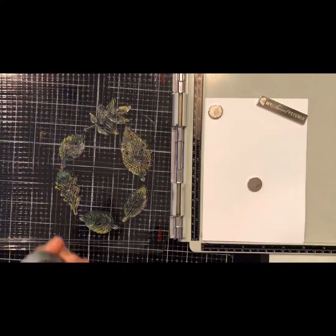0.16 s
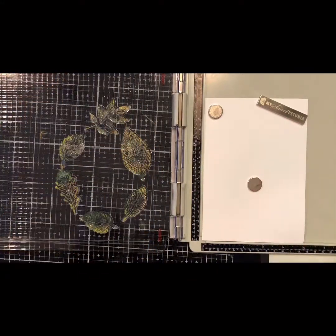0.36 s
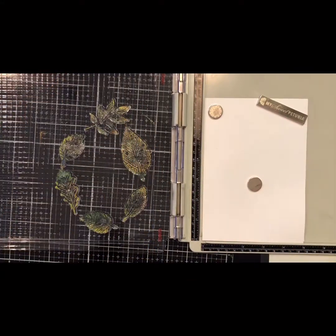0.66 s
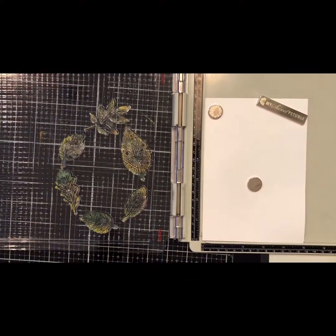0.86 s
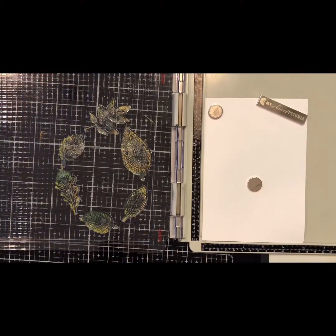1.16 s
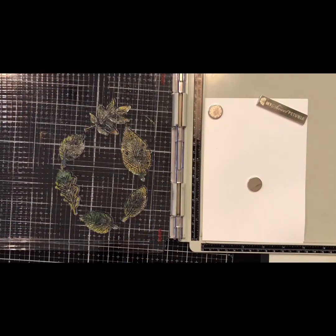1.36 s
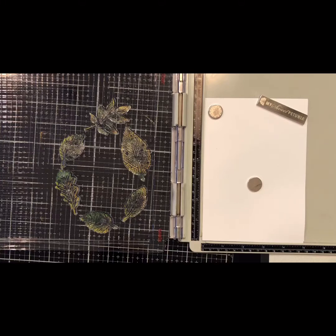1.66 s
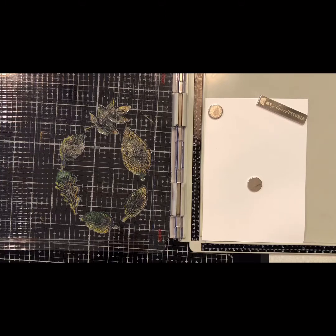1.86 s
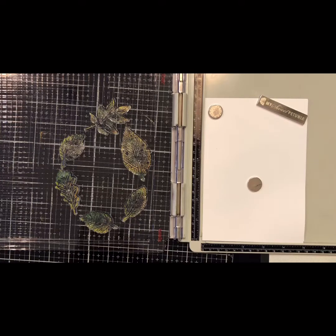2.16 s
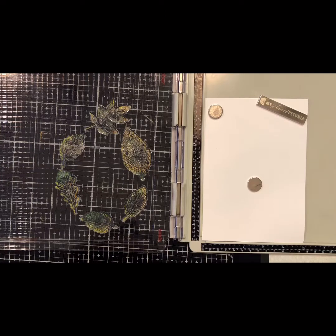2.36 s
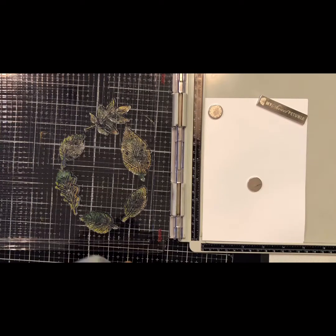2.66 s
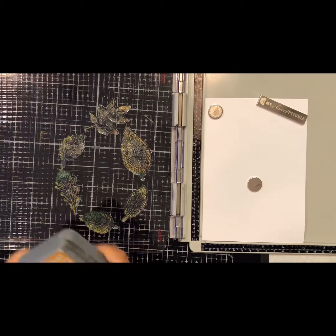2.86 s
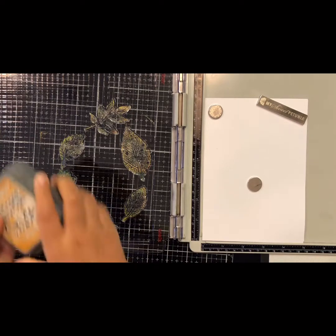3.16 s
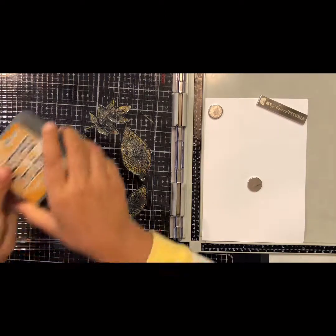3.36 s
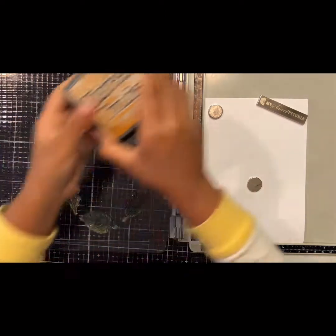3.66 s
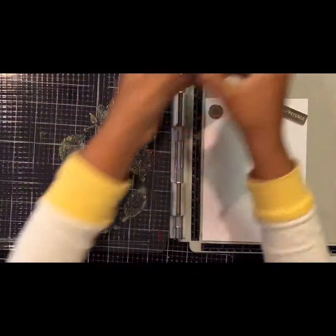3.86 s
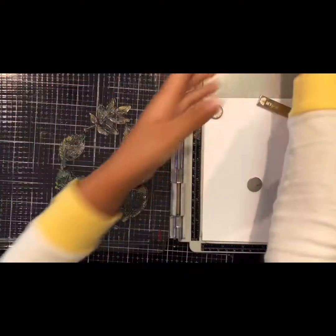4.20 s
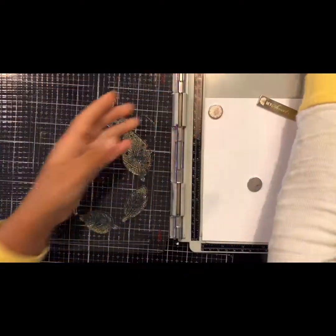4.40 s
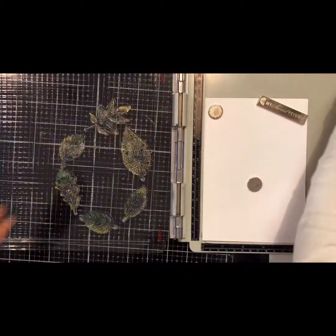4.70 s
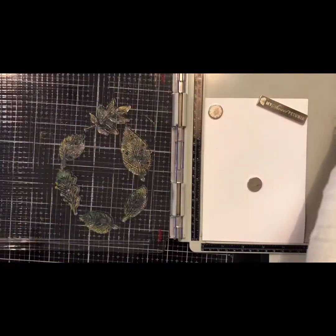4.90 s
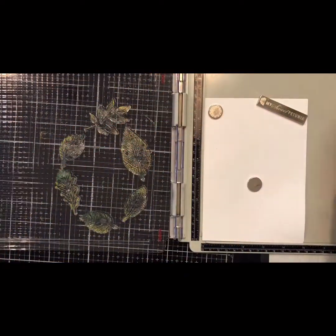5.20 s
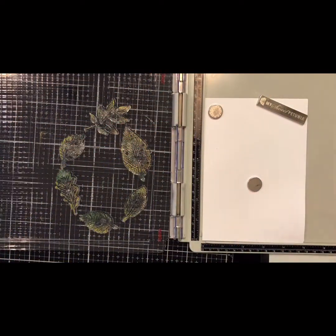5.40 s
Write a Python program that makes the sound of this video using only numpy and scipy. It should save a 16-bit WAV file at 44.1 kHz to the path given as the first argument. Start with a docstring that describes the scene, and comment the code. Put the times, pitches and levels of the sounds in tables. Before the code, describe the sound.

A plastic ink pad clicks and ticks softly in the hands, then pad and lid clatter onto a table, over quiet room hum.

```python
"""A craft table in a small room, heard close up from one microphone above the table top.
Ventilation and mains hum lie underneath; skin slides on plastic and sleeves brush the table edge.
The case of a plastic ink pad clicks in the hands, and the tacky pad ticks as it is dabbed on clear stamps.
Then pad and lid are put down: each blow rings the plastic shell and thuds in the table, the pad bounces,
the lid rocks to rest, and the walls answer briefly."""
import sys
import numpy as np
from scipy import signal
from scipy.fft import rfft, irfft, next_fast_len
from scipy.io import wavfile
from scipy.ndimage import map_coordinates

SR = 44100
rng = np.random.default_rng(int(sys.argv[2]) if len(sys.argv) > 2 else 0)


def int16_out(signal):
    """Quantize to a 16-bit WAV file."""
    q = np.round(np.clip(np.atleast_2d(signal).T, -1, 1) * 32767)
    wavfile.write(sys.argv[1], SR, q.astype(np.int16))


N = 244311
HIT_SAMPLES = 4096


def amp(db):
    """Decibels to gain."""
    return 10 ** (np.asarray(db) / 20)


def unit(x):
    """Scale to rms 1."""
    return x / np.sqrt(np.mean(x ** 2) + 1e-20)


def sized(x, db):
    """Scale a short sound to the energy of 5 ms at this level."""
    return x * amp(db) * np.sqrt(0.005 * SR / np.sum(x ** 2))


def add(track, time, x):
    """Mix x into the track at a time in seconds."""
    part = track[round(time * SR):][:len(x)]
    part += x[:len(part)]


def along(points, hz):
    """Interpolate (frequency, value) points on a log frequency axis."""
    freqs, values = np.transpose(points)
    return np.interp(np.log(hz + 1), np.log(freqs + 1), values)


def wobble(rate):
    """A smooth random curve, rate knots a second."""
    knots = rng.standard_normal(int(N * rate / SR) + 4)
    return map_coordinates(knots, [np.arange(N) * rate / SR])


def filtered(x, response):
    """Pass x through a complex frequency response."""
    size = next_fast_len(2 * len(x))
    return irfft(rfft(x, size) * response(np.fft.rfftfreq(size, 1 / SR)), size)[:len(x)]


def band(x, edges_hz, kind, order):
    """Causal Butterworth filter."""
    return signal.sosfilt(signal.butter(order, edges_hz, kind, fs=SR, output='sos'), x)


def noise(spectrum):
    """Coloured noise of rms 1."""
    return unit(filtered(rng.standard_normal(N), lambda hz: amp(along(spectrum, hz))))


def resonance(f, hz, width):
    """One damped mode, gain 1 at its centre."""
    return 1j * f * width / (hz * hz - f * f + 1j * f * width)


def ring(x, modes):
    """x drives an object's modes; heard near the struck spot they cancel in the gaps between them."""
    return filtered(x, lambda f: sum(amp(db) * resonance(f, hz, width) for hz, width, db in modes))


# ventilation noise in the room: (frequency [Hz], relative density [dB])
AIR_SPECTRUM = [(25, -35), (45, -24.5), (60, -16.5), (100, -16.5), (160, -6), (250, -8), (400, -9),
                (600, -14), (900, -17), (1400, -25), (2300, -33.5), (5000, -41), (9000, -48),
                (16000, -49.5)]
# hum lines of mains and fan: (frequency [Hz], relative level [dB])
HUM_LINES = [(59.5, -68.5), (149, -57.5), (186, -62), (237.5, -59), (296.8, -59), (356.2, -59.5),
             (415, -61), (546, -66.5)]


def room_tone():
    """Behind everything, soft ventilation noise and slightly unsteady hum."""
    t = np.arange(N) / SR
    hum = np.zeros(N)
    for hz, db in HUM_LINES:
        hum += amp(db + 1.9 * wobble(3)) * np.sin(2 * np.pi * hz * t + 0.35 * wobble(3.7))
    air = amp(-54 + 1.2 * wobble(2.4)) * noise(AIR_SPECTRUM)
    return amp(-0.5) * hum + air


# reverberation of the small room: (frequency [Hz], time to fall 60 dB [s])
ROOM_DECAY = [(200, 0.63), (1000, 0.44), (2500, 0.47), (6000, .38), (14000, 0.21)]


def room(x, early_db, tail_db, early_t60):
    """Reflections at the microphone: quick scatter off the near table top, a tail from the walls."""
    hz, frame_times, spectra = signal.stft(rng.standard_normal(SR // 2), SR, nperseg=256)
    decay = amp(-60 * frame_times / along(ROOM_DECAY, hz)[:, None])
    tail = signal.istft(spectra * decay, SR, nperseg=256)[1]
    t = np.arange(len(tail)) / SR
    early = rng.standard_normal(len(t)) * amp(-60 * t / early_t60)
    onset = 1 - np.exp(-(t / 0.0007) ** 2)
    echoes = amp(early_db) * early / np.linalg.norm(early) + amp(tail_db) * tail / np.linalg.norm(tail)
    return signal.fftconvolve(x, onset * echoes)[:N]


def strokes(rows, rise, steepness):
    """Gain of sliding: each stroke speeds up for a share (rise) of its length, then slows to rest."""
    t, gain = np.arange(N) / SR, np.zeros(N)
    for start, length, db in rows:
        effort = np.interp(t, [start, start + rise * length, start + length], [0, 1, 0])
        gain += amp(db) * np.sin(np.pi / 2 * effort) ** steepness
    return gain


# hiss of skin on plastic: (frequency [Hz], relative density [dB])
SKIN_SPECTRUM = [(1180, -24), (2000, -3.5), (2760, -9), (4230, -8), (7380, -13.5), (14800, -14),
                 (16000, -12)]
# slides of the hands: (time [s], length [s], top level [dB])
SKIN_SLIDES = [(-0.08, 0.21, -65), (0.73, 0.41, -73), (1.75, 0.086, -63.5), (1.92, 0.45, -72),
               (2.6, 0.33, -64.5), (2.94, 0.24, -65), (4.83, 0.27, -71), (5.28, 0.18, -64),
               (5.47, 0.1, -68)]


def skin():
    """Skin slides over the plastic with a faint, grainy hiss."""
    motion = strokes(SKIN_SLIDES, rise=0.34, steepness=0.91)
    return motion * unit(noise(SKIN_SPECTRUM) * amp(2.1 * wobble(250)))


def stick_slip(slips_per_s, rate_swing, depth):
    """Cloth catches and lets go: a gain that jumps at each release and dies down before the next."""
    cycles = np.cumsum(slips_per_s * np.exp(rate_swing * wobble(40))) / SR
    return 1 - depth + depth * unit(amp(-26 * (cycles % 1)))


# rub of cloth on the table: (frequency [Hz], relative density [dB])
CLOTH_SPECTRUM = [(350, -19), (520, 5.5), (750, -4.5), (1000, 2), (1350, -6.5), (1650, -9.5), (3000, -22),
                  (5000, -30), (12000, -36), (16000, -57)]
# passes of the sleeves: (time [s], length [s], top level [dB])
SLEEVE_BRUSHES = [(0.15, 0.14, -58.5), (2.02, 0.12, -58.5), (2.27, 0.16, -55.5), (2.885, 0.17, -48.5),
                  (3.45, 0.397, -60), (5.44, 0.11, -49.5)]


def sleeves():
    """Sleeves brush the table edge in small uneven catches."""
    motion = strokes(SLEEVE_BRUSHES, rise=0.8, steepness=0.74)
    rub = noise(CLOTH_SPECTRUM) * stick_slip(slips_per_s=190, rate_swing=0.12, depth=0.68)
    return motion * unit(rub * amp(1.9 * wobble(60)))


def contact(length, grit, rise):
    """A sharp push and a scatter of tiny slips that swells over a share (rise) of its length, then dies."""
    progress = np.arange(HIT_SAMPLES) / SR / length
    swell = 1 - np.exp(-(progress / rise) ** 2)
    slips = rng.standard_normal(HIT_SAMPLES) * amp(-20 * progress) * swell
    return (progress == 0) + grit * slips / np.linalg.norm(slips)


# modes of the pad's base, dabbed here and put down later: (frequency [Hz], width [Hz], gain [dB])
PAD_MODES = [(596, 110, -5), (937, 81, -5.5), (1357, 190, -5), (1783, 480, -4), (2800, 1000, -7.5),
             (3900, 800, -12.5), (4780, 1000, -12.5), (6730, 930, -11), (8980, 1600, -13),
             (10700, 1300, -17), (13900, 1500, -22)]
# light touches on the pad: (time [s], tap level [dB], crackle level [dB])
PAD_TOUCHES = [(0.98, -52.5, -57.5), (1.653, -60, -58.5), (1.696, -48, -64), (1.726, -56, -72),
               (1.793, -57.5, -74), (1.885, -59.5, -78), (1.926, -62, -83), (2.106, -50.5, -52.5),
               (2.446, -57.5, -61), (2.484, -58.5, -64), (2.634, -54, -58.5), (3.023, -50.5, -61),
               (3.518, -53, -61)]


def ticks():
    """Fingers and tacky ink tick on the pad: a dull tap and a fine sticky crackle."""
    out = np.zeros(N)
    for time, tap_db, crackle_db in PAD_TOUCHES:
        touch = contact(length=0.0036, grit=3.1, rise=0.086)
        tap = band(ring(touch, PAD_MODES), 2700, 'low', order=1)
        crackle = band(touch, 4800, 'high', order=2)
        add(out, time, sized(tap, tap_db) + sized(crackle, crackle_db))
    return out + room(out, early_db=-13.5, tail_db=-8.5, early_t60=0.036)


# modes of the table top below the microphone: (frequency [Hz], width [Hz], gain [dB])
TABLE_MODES = [(250, 100, -13.5), (360, 150, -2), (460, 150, 0), (600, 110, -8)]


def knock(hit, push, modes, focus_db, focus_width_hz, fizz_db):
    """The shell rings, most near the struck spot's note; hard blows crack and fizz, flat ones thud."""
    _, level_db, bright_db, note_hz, _ = hit
    flat_note_hz, crack_from_hz, fizz_from_hz = 920, 2450, 7000
    # contacts smaller than a full, flat blow sound higher and thud less: 31 dB an octave
    thud_db = -2.5 - 31 * np.log2(note_hz / flat_note_hz)
    thud = sized(band(ring(push, TABLE_MODES), [190, 800], 'band', order=3), thud_db)
    shell = ring(push, modes)
    spot = filtered(shell, lambda f: 1 + amp(focus_db) * resonance(f, note_hz, focus_width_hz))
    radiated = band(spot, max(340, 0.37 * note_hz), 'high', order=4)  # a small shell gives little bass
    body = sized(band(radiated, crack_from_hz, 'low', order=4), 0)
    crack = sized(band(shell, [crack_from_hz, fizz_from_hz], 'band', order=4), bright_db)
    fizz = sized(band(shell, fizz_from_hz, 'high', order=5), fizz_db + 1.35 * bright_db)
    return amp(level_db) * (thud + body + crack + fizz)


def knocks(hits, modes, grit, rise, **tone):
    """An object's blows: jagged straight to the microphone, smoother as spread in all directions."""
    direct, spread = np.zeros((2, N))
    for hit in hits:
        time, length = hit[0], hit[-1]
        add(direct, time, knock(hit, contact(length, grit, rise), modes, **tone))
        add(spread, time, knock(hit, signal.unit_impulse(HIT_SAMPLES), modes, **tone))
    return direct, spread


# modes of the case, damped by the hands: (frequency [Hz], width [Hz], gain [dB])
CASE_MODES = [(772, 210, -17.5), (990, 89, -5.5), (1200, 110, -8.5), (1390, 270, 2), (2030, 430, -3),
              (2780, 300, -4), (3236, 570, 3), (3680, 440, -4.5), (4230, 380, 3), (5280, 450, -4),
              (7630, 1940, -18.5), (12860, 9200, -27.5)]
# its modes that ring on after a snap: (frequency [Hz], width [Hz], gain [dB])
CASE_AFTER_RING = [(1230, 11, 0.5), (2680, 11, 6.5), (3690, 14, 1)]
# clicks in the hands: (time [s], body level [dB], brightness [dB], note [Hz], contact length [s])
CASE_CLICKS = [(0.6325, -25.5, -1, 1930, 0.0025), (0.778, -41, -5, 1260, 0.011),
               (0.7895, -22.5, -1, 1230, 0.0052), (0.7985, -35, -15, 1210, 0.0021),
               (0.808, -32.5, -22, 1300, 0.014), (0.9375, -40.5, -9.5, 1350, 0.007),
               (1.087, -44.5, -10.5, 1320, 0.0071), (1.1402, -26.5, -6, 1150, 0.0044),
               (3.2415, -48, -10, 1620, 0.0089)]


def case():
    """The lid scrapes and snaps over the rim of the hand-held case; a few modes ring on."""
    direct, spread = knocks(CASE_CLICKS, CASE_MODES, grit=2.26, rise=0.19,
                            focus_db=14, focus_width_hz=470, fizz_db=-7.5)
    reflections = room(spread, early_db=-19.5, tail_db=-13.5, early_t60=0.06)
    return direct + ring(spread, CASE_AFTER_RING) + reflections


# modes of the lid as it strikes: (frequency [Hz], width [Hz], gain [dB])
LID_MODES = [(960, 110, -12), (1466, 120, -17), (1948, 396, 1), (3636, 160, -2.5), (4380, 230, -6),
             (5370, 170, -6.5), (6300, 110, -14), (7330, 510, -13), (8170, 140, -26), (9600, 640, -21),
             (10700, 800, -27.5)]
# its modes that ring on, free of the table: (frequency [Hz], width [Hz], gain [dB])
LID_AFTER_RING = [(1860, 22, -5), (3650, 14, -5.5), (4600, 24, -4.5), (5400, 15, 1), (6210, 9, 6),
                  (7150, 14, 0), (8200, 12, 7), (10070, 18, 2)]
# the lid on the table: (time [s], body level [dB], brightness [dB], note [Hz], contact length [s])
LID_KNOCKS = [(4.592, -45, -10, 1900, 0.0079), (4.6072, -18.5, -0.5, 2020, 0.0023),
              (4.7798, -26, -9, 1810, 0.0029), (4.7925, -37, -17, 1950, 0.0076),
              (4.8033, -30, -6.5, 1840, 0.0032), (4.8275, -34.5, -17, 1780, 0.0041),
              (4.914, -48, -15.5, 1480, 0.023), (4.9848, -32, -15, 1790, 0.0034),
              (4.9928, -39, -10.5, 1900, 0.0041), (5.0005, -36, -13, 1837, 0.0013)]


def lid():
    """The thin empty lid touches down, drops and rocks, ringing clearly between contacts."""
    direct, spread = knocks(LID_KNOCKS, LID_MODES, grit=1.3, rise=0.079,
                            focus_db=-1.0, focus_width_hz=330, fizz_db=-12.5)
    reflections = room(spread, early_db=-7.5, tail_db=-13, early_t60=0.067)
    return direct + ring(spread, LID_AFTER_RING) + reflections


# the pad on the table: (time [s], body level [dB], brightness [dB], note [Hz], contact length [s])
PAD_KNOCKS = [(4.1771, -15, -13, 1660, 0.0024), (4.1884, -20, -5.5, 1560, 0.005),
              (4.2146, -27.5, -11, 1590, 0.0046), (4.2197, -29, -12.5, 1500, 0.0052),
              (4.228, -35, -14.5, 1680, .003), (4.2926, -18.5, -3, 920, 0.0058)]


def pad():
    """The pad's stiff base lands on a corner, bounces and falls flat in clean, short blows."""
    direct, spread = knocks(PAD_KNOCKS, PAD_MODES, grit=1.0, rise=0.12,
                            focus_db=11, focus_width_hz=250, fizz_db=-4.5)
    return direct + room(spread, early_db=-14, tail_db=-12.5, early_t60=0.055)


def scene():
    """Everything in mono, from close above the table."""
    return (case() + pad() + lid() + ticks() + skin() + sleeves() + room_tone())[None]


def record(dry):
    """The camera's microphone channel keeps nothing above its band limit."""
    top_hz = 16300
    return np.array([filtered(x, lambda hz: 1 / (1 + (hz / top_hz) ** 100)) for x in dry])


dry = scene()
out = record(dry)
int16_out(out)
```